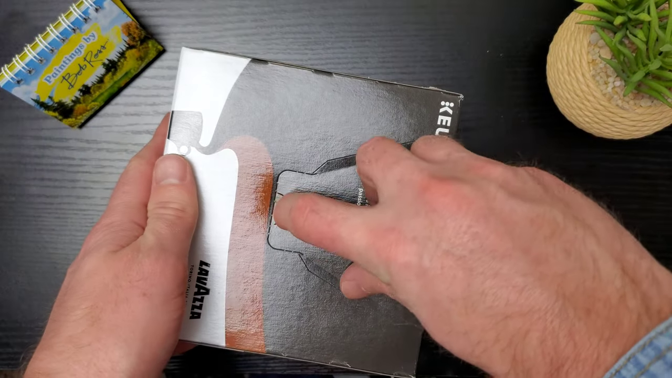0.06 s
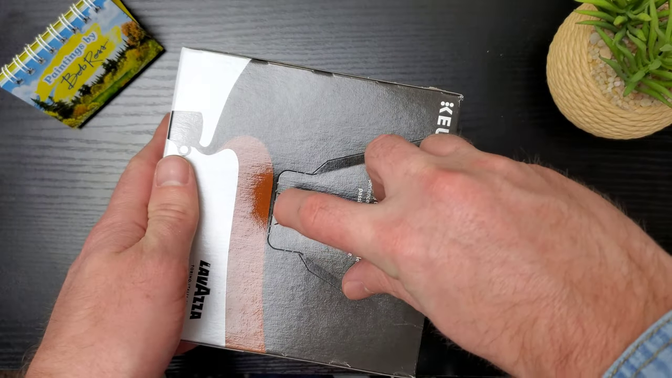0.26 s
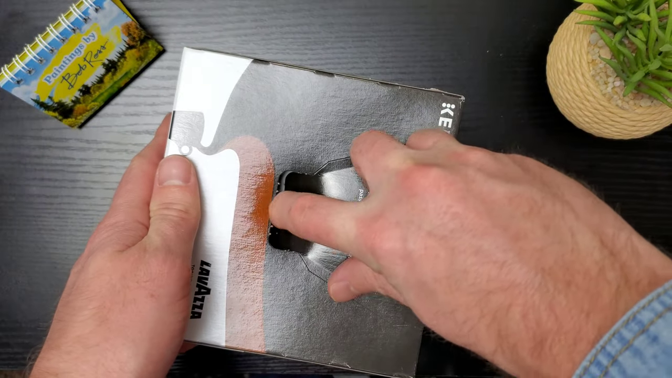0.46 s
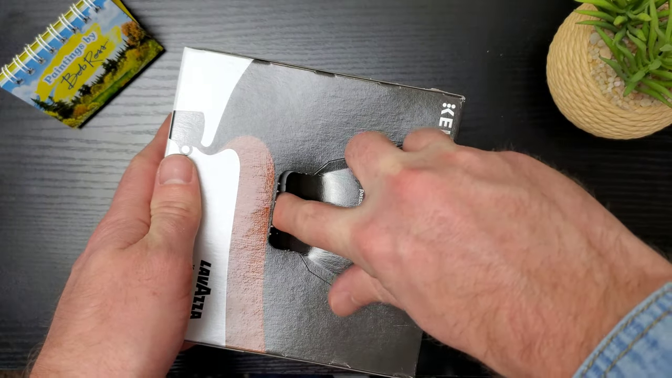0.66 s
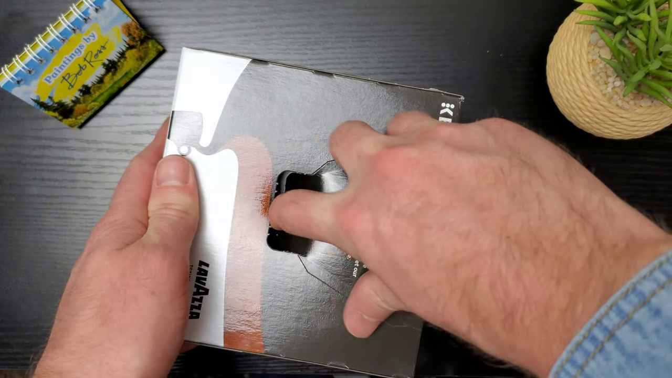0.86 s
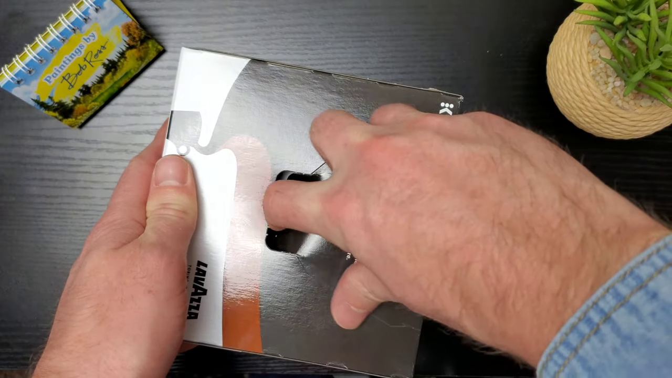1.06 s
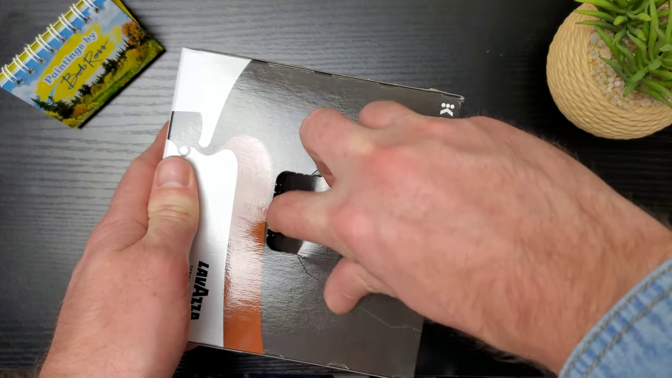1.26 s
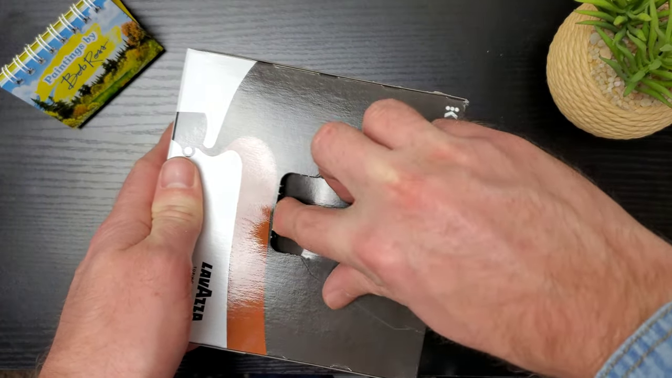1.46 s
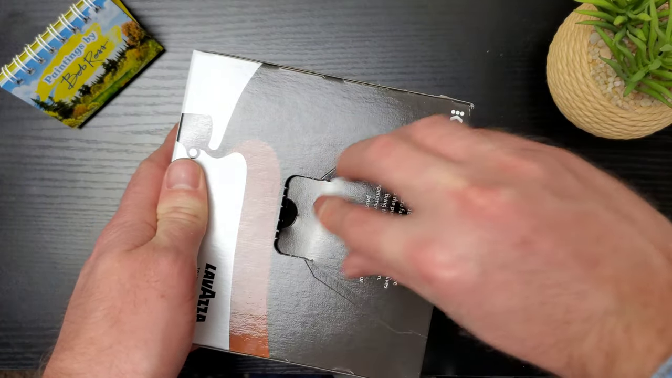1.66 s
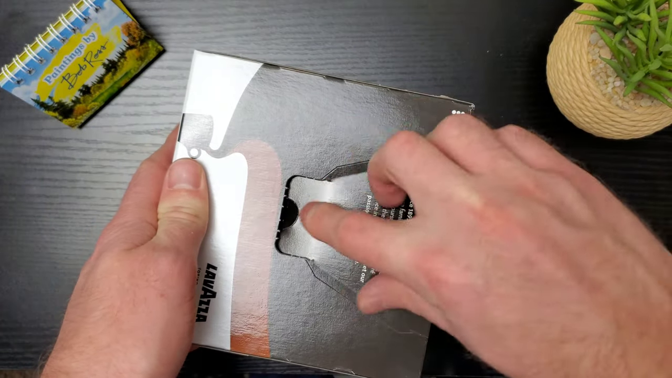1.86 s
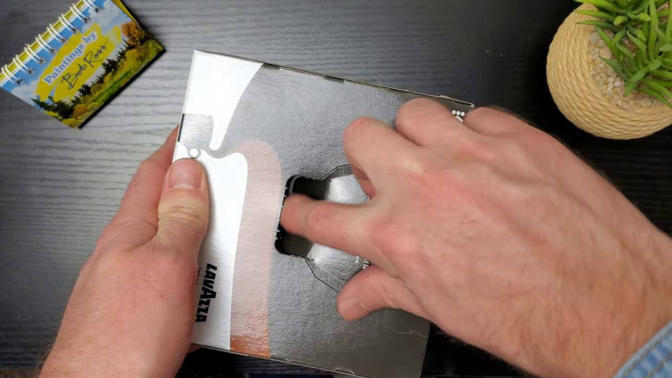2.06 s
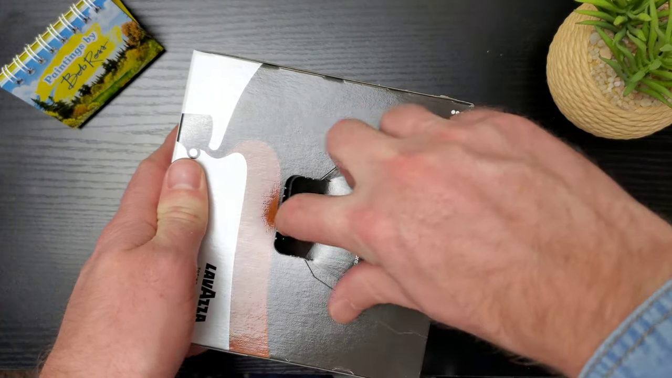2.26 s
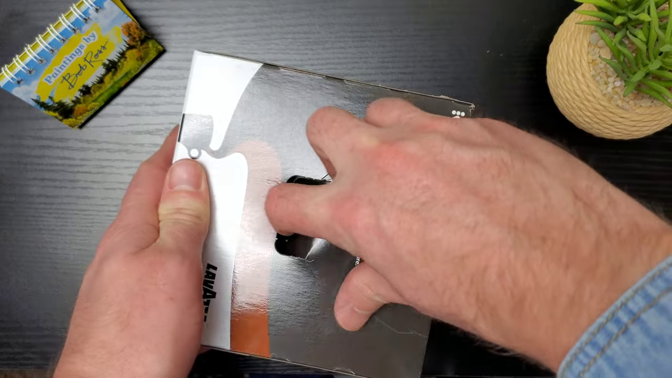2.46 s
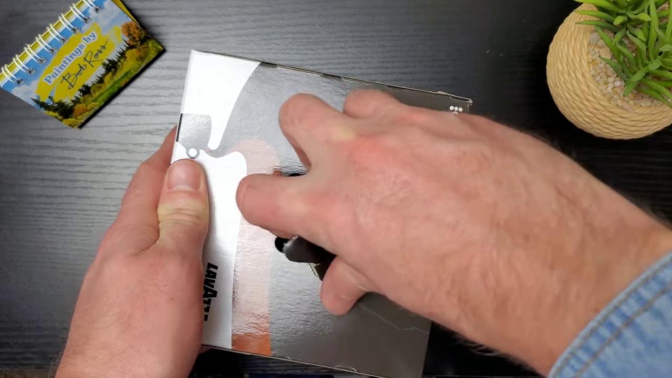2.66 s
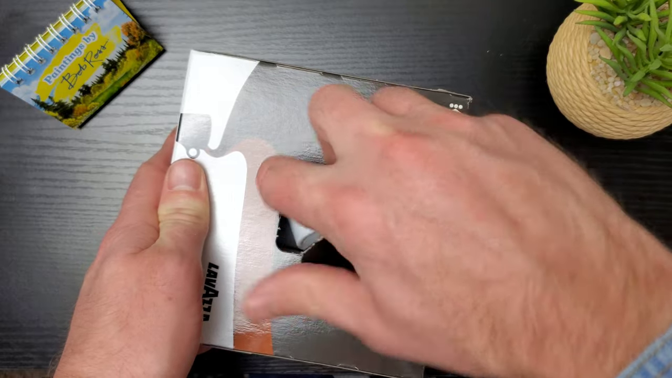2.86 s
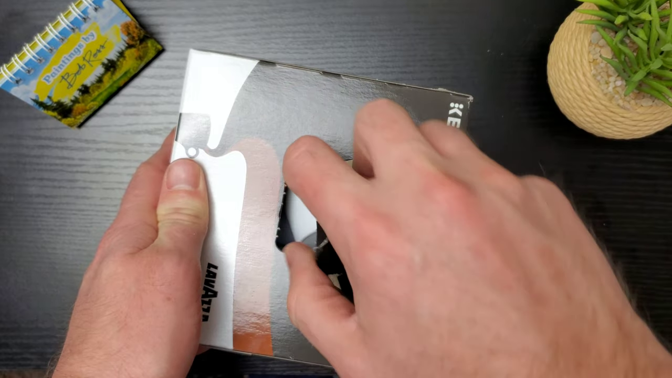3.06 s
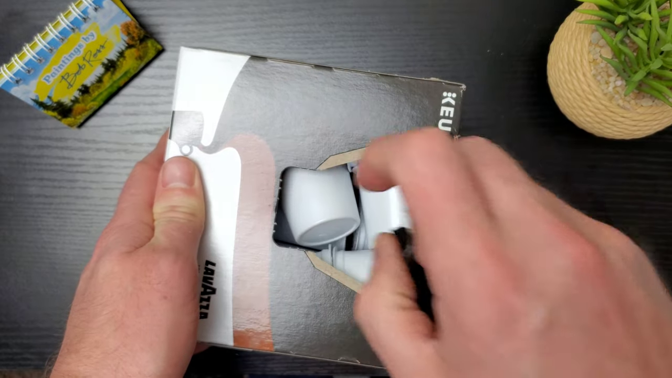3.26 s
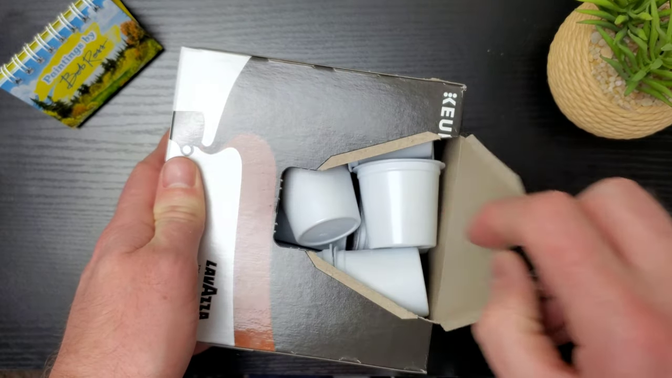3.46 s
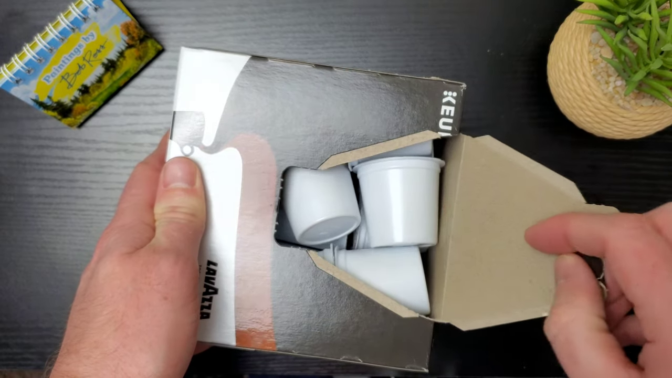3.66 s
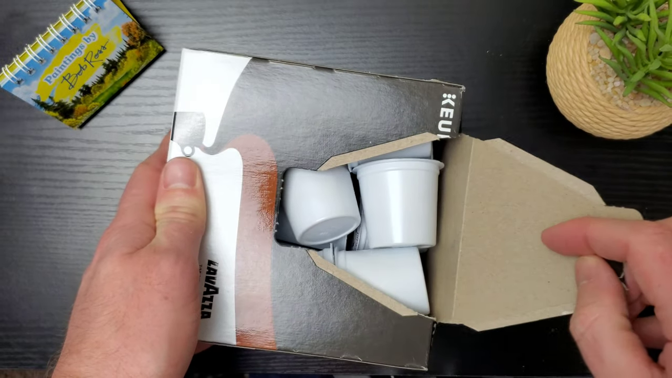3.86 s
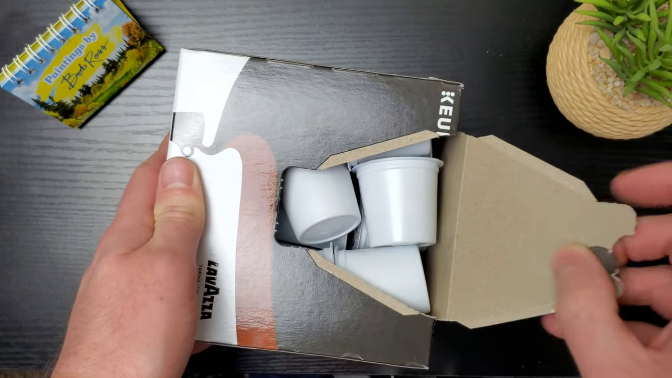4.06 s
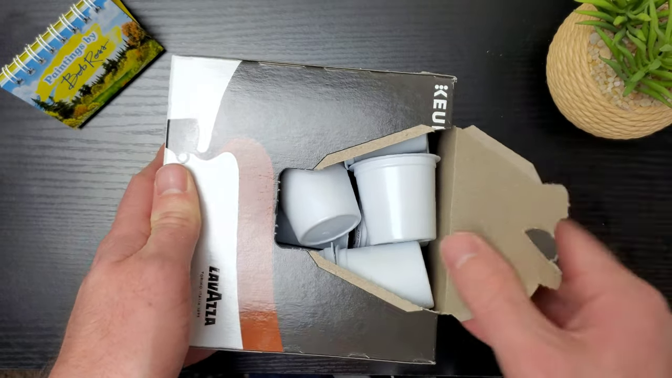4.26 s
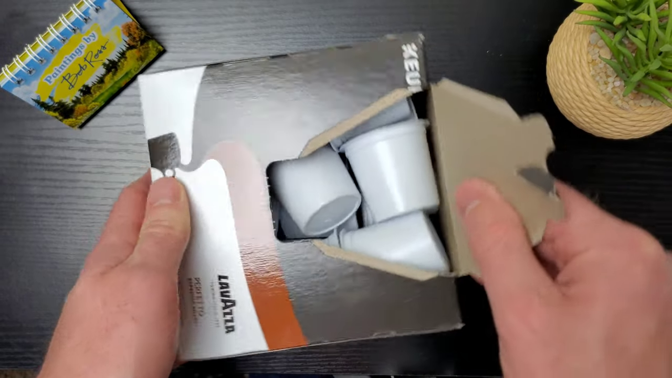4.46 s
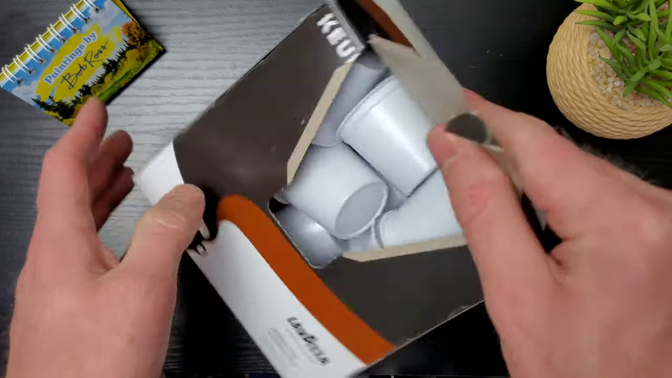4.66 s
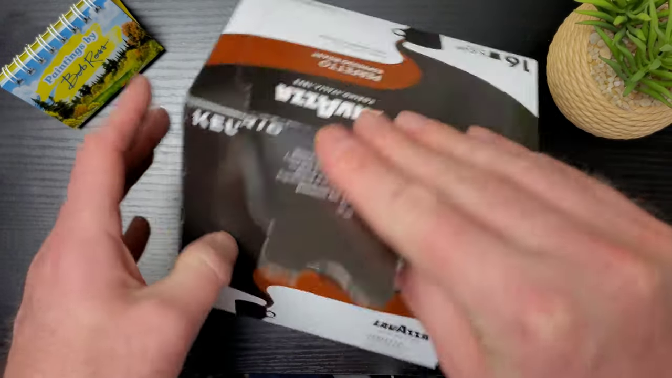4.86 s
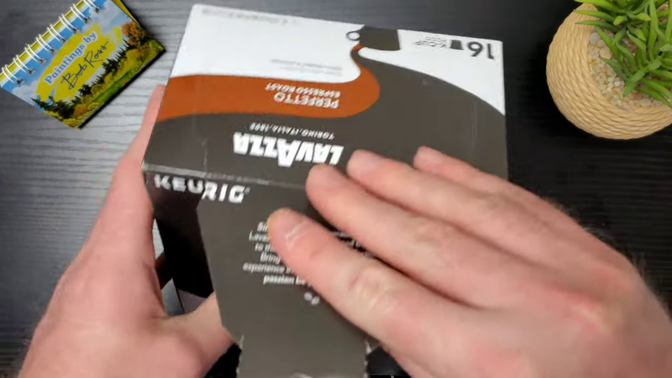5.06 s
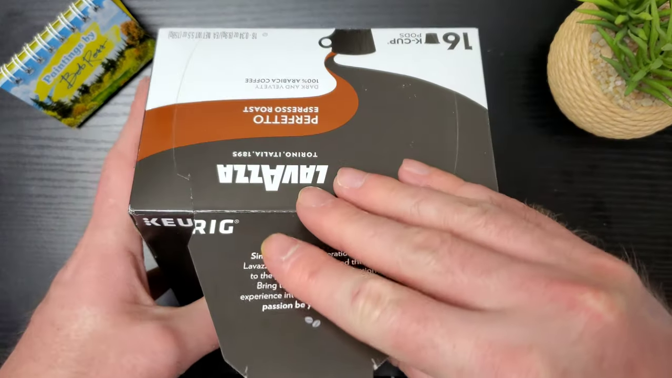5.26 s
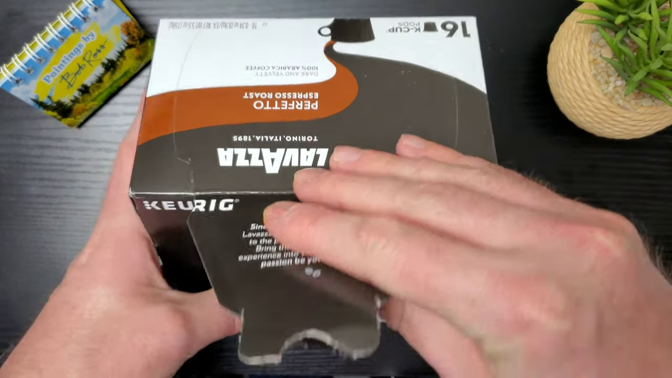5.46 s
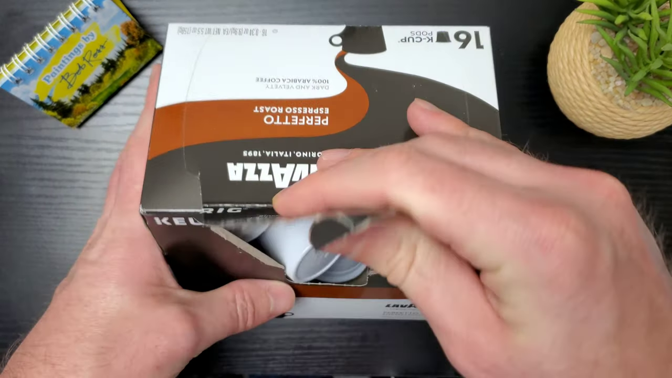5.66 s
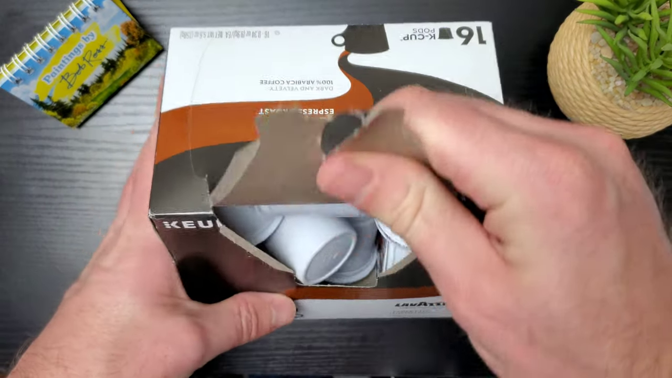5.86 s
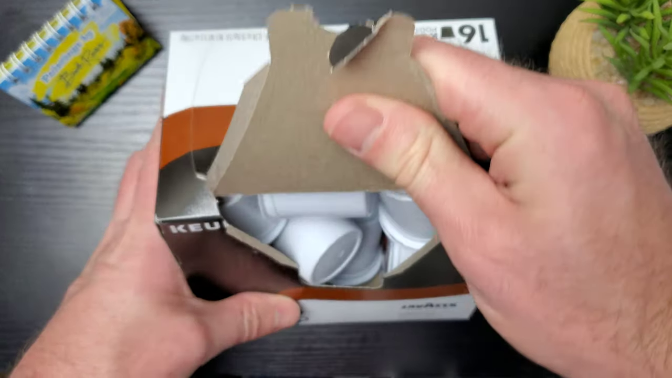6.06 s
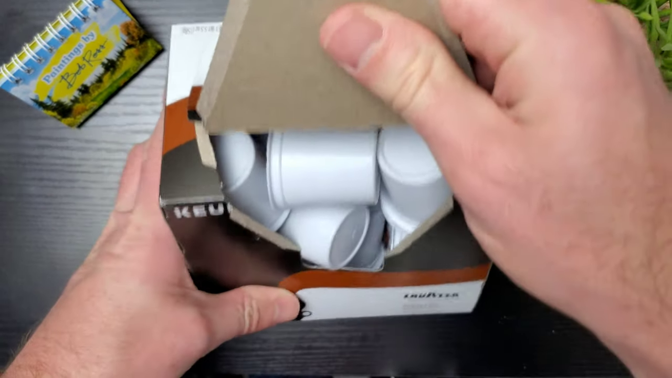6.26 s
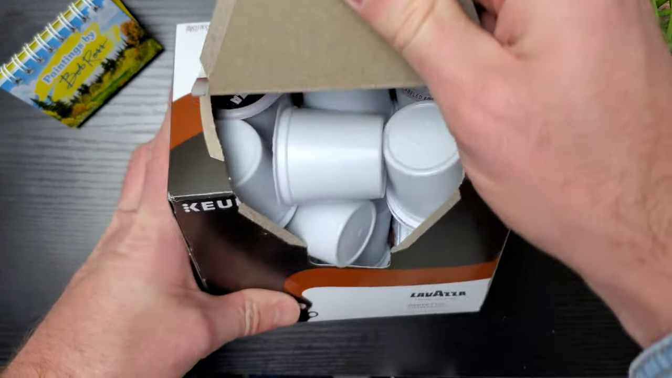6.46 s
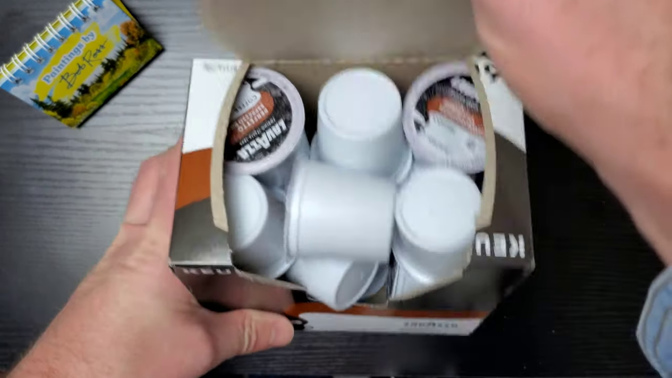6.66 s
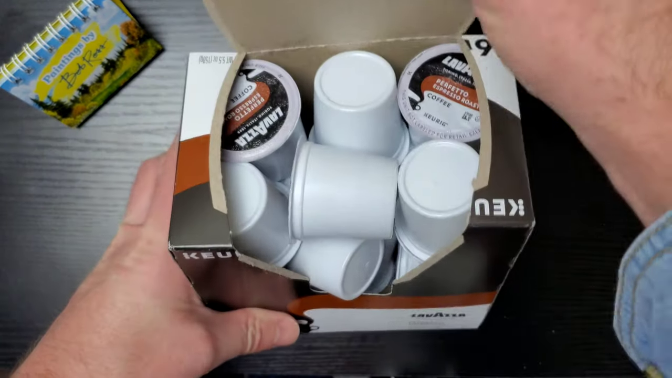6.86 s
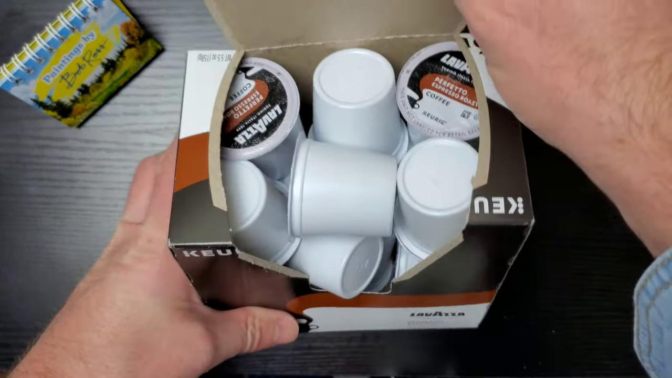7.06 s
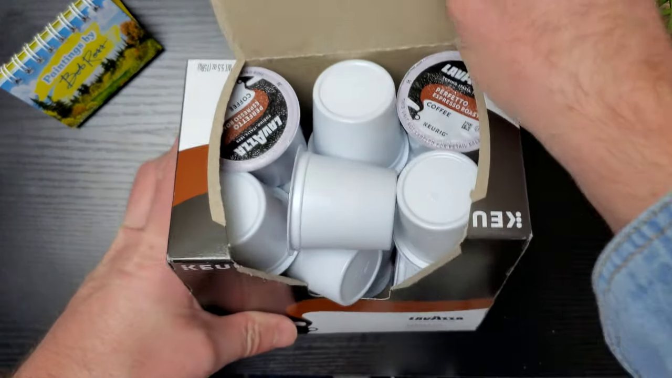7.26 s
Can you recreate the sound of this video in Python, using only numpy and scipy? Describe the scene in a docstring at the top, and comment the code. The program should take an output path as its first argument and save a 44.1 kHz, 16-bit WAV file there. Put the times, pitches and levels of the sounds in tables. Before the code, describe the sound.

Close-up box opening: brittle card snaps, skin rubbing, one loud crease pop, quiet handling, then jerky ripping and a few dull knocks.

```python
"""Opening a perforated cardboard box

Perforation bridges snap, a fingertip judders on the lid, the flap rips and tears, and its crease pops:
bursts of random fibre breaks excite card, box and room resonances. Pods and fingers bump the walls,
hands rub the card (filtered grains) and the desk rumbles (filtered noise).
The microphone is close, in a small room with faint air noise and a low wavering hum."""
import sys
import numpy as np
from scipy import signal
from scipy.fft import rfft, irfft, next_fast_len
from scipy.io import wavfile
from scipy.ndimage import uniform_filter1d, map_coordinates

SR = 44100
rng = np.random.default_rng(int(sys.argv[2]) if len(sys.argv) > 2 else 0)


def transcribe(u):
    """Save the signal u as a 16-bit wav file named by the first command-line argument.

    u: samples, shape (n,) or (channels, n), limited to [-1, 1]; the rate is SR.
    q: integer samples, one column per channel.
    """
    v = np.clip(np.atleast_2d(u).T, -1, 1)
    q = np.round(v * 32767).astype(np.int16)
    wavfile.write(sys.argv[1], SR, q)


N = 321930
RING = 16384  # length of impulse responses and blows [samples]
BLOW = SR // 50  # span over which the energy of a blow is averaged [samples]

# spectral shape of the lid's card: (frequency [Hz], relative density [dB per Hz])
CARD_SPECTRUM = [(29, -45), (50, -4), (163, -4), (297, 0.5), (387, -5.5), (612, 2), (760, -7), (1120, -4),
                 (1990, -14), (2190, -22.5), (2410, -18.5), (2720, -21.5), (8250, -33.5), (14700, -51.5),
                 (15800, -61)]
# spectral shape of the flap: (frequency [Hz], relative density [dB per Hz])
FLAP_SPECTRUM = [(59, -72), (100, -22), (135, -4.5), (271, -2), (314, 1.5), (460, -15), (533, -6.5),
                 (764, -12.5), (849, -16), (1440, -12.5), (3740, -23.5), (8020, -27.5), (11000, -33.5),
                 (14800, -29.5), (15800, -57)]
# spectral shape of rubbed or bumped card: (frequency [Hz], relative density [dB per Hz])
RUB_SPECTRUM = [(76, -22), (130, 7), (190, 0.5), (315, 4.5), (470, -15), (520, -9), (761, -7), (1310, -3.5),
                (2750, -18.5), (4110, -22.5), (4640, -23), (7980, -26), (10800, -34.5), (14300, -32.5),
                (15800, -58)]


def amp(db):
    """Level: converts decibels to an amplitude ratio."""
    return 10 ** (np.asarray(db) / 20)


def unit(x):
    """Normalisation: scales x to an rms of 1."""
    return x / np.sqrt(np.mean(x ** 2) + 1e-20)


def along(points, hz):
    """Interpolation: reads (frequency, value) points on a logarithmic frequency axis."""
    f, v = np.transpose(points)
    return np.interp(np.log(hz + 1), np.log(f + 1), v)


def wobble(rate):
    """Slow fluctuation: a smooth curve through `rate` random knots a second."""
    knots = rng.standard_normal(int(N * rate / SR) + 4)
    return map_coordinates(knots, [np.arange(N) * rate / SR])


def add(track, s, sound):
    """Superposition: mixes a sound into the track at time s [s]."""
    start = max(round(s * SR), 0)
    track[start:start + len(sound)] += sound[:max(N - start, 0)]


def through(x, response):
    """Linear system: convolves x with an impulse response."""
    return signal.fftconvolve(x, response)[:len(x)]


def bands(x, *edges_hz):
    """Filter bank: splits x at the given frequencies, lowest band first."""
    cuts = [(edges_hz[0], "low")]
    cuts += [(pair, "band") for pair in zip(edges_hz, edges_hz[1:])]
    cuts += [(edges_hz[-1], "high")]
    filters = [signal.butter(4, hz, kind, fs=SR, output="sos") for hz, kind in cuts]
    return [signal.sosfilt(sos, x) for sos in filters]


def colour(spectrum):
    """Minimum phase: folding the cepstrum gives a causal response of energy 1 with this spectral shape."""
    magnitude = amp(along(spectrum, np.fft.rfftfreq(RING, 1 / SR)))
    cepstrum = irfft(np.log(magnitude + 1e-6))
    cepstrum[1:RING // 2] *= 2
    cepstrum[RING // 2 + 1:] = 0
    response = irfft(np.exp(rfft(cepstrum)))
    return response / np.linalg.norm(response)


def box(spectrum, ring_db, detune):
    """Modal resonance: the card's broad response plus decaying box modes, which shift with the grip."""
    # walls and enclosed air: (nominal frequency [Hz], bandwidth [Hz], relative peak level [dB])
    modes = [(127, 15, 9), (212, 38, 12.5), (290, 7.9, 11), (443, 13, 1), (475, 20.5, 10), (612, 54, 20),
             (902, 14, 3), (957, 185, 10.5), (1150, 67, -2), (1274, 76, -7.5), (1500, 51, -10.5),
             (1760, 170, -10), (1895, 53, 5), (2373, 150, -1)]
    t = np.arange(RING // 4) / SR
    ring = np.zeros(len(t))
    for k, (hz, width, db) in enumerate(modes):
        shifted_hz = hz * np.exp(detune * rng.normal())
        decay = np.exp(-np.pi * width * t)
        ring += (-1) ** k * amp(db) * width * decay * np.cos(2 * np.pi * shifted_hz * t)
    ring = np.pad(ring / np.linalg.norm(ring), (0, RING - len(t)))
    return colour(spectrum) + amp(ring_db) * ring


def room(wet_db):
    """Reverberation: direct sound, then a fresh diffuse tail with a decay time for each frequency."""
    # reverberation time: (frequency [Hz], time to decay by 60 dB [s])
    decay_times = [(100, 0.21), (260, 0.25), (700, 0.3), (1840, 0.24), (4850, 0.26), (12800, 0.16)]
    hz, t, z = signal.stft(rng.standard_normal(RING), SR, nperseg=256)
    decay = amp(-60 * t / along(decay_times, hz)[:, None])
    tail = signal.istft(z * decay, SR, nperseg=256)[1][:RING]
    tail *= 1 - np.exp(-(np.arange(RING) / SR / .003) ** 2)  # builds up within a few milliseconds
    response = amp(wet_db) * tail / np.linalg.norm(tail)
    response[0] += 1
    return response


def fibres(size, rate, spread_db):
    """Fracture noise: tiny breaks at random moments (rate per second), a few much larger than the rest."""
    sizes = amp(spread_db * np.clip(rng.standard_normal(size), -2, 2))
    signs = rng.choice([-1, 1], size)
    return sizes * signs * (rng.random(size) < rate / SR)


def gesture(start, length, attack, release):
    """Force envelope: a push builds up exponentially before start, holds at 1 and lets go."""
    t = np.arange(N) / SR - start
    return np.exp(np.minimum(t, 0) / attack - np.maximum(t - length, 0) / release)


def resonate(x, hz, q, boost_db):
    """Resonance: adds the response of one lightly damped mode to x."""
    return x + amp(boost_db) * signal.lfilter(*signal.iirpeak(hz, q, SR), x)


def band_levels(x):
    """Band energy: thump, panel, crack and fizz levels [dB], the energy averaged over BLOW samples."""
    # limits of the four bands: (thump from, panel from, crack from, fizz from, fizz to) [Hz]
    edges_hz = (90, 400, 2500, 9300, 15500)
    power = 2 * np.abs(rfft(x)) ** 2 / len(x) / BLOW
    in_band = np.histogram(np.fft.rfftfreq(len(x), 1 / SR), edges_hz, weights=power)[0]
    return 10 * np.log10(in_band + 1e-20)


def voiced(x, levels_db):
    """Equalisation: tilts x smoothly towards four band levels, then sets the panel level exactly."""
    # centres of the bands: (thump, panel, crack, fizz) [Hz]
    centres_hz = (230, 900, 4800, 12000)
    x = through(x, colour(list(zip(centres_hz, levels_db - band_levels(x)))))
    return x * amp(levels_db[1] - band_levels(x)[1])


def blow(spectrum, levels_db, hz, length, rate, rise, first_db, ring_db, flex_q, flex_db, wet_db):
    """Impulsive excitation: one release amid a dying burst of breaks makes card, box and room ring."""
    t = np.arange(RING) / SR
    envelope = np.exp(-(t / length) ** 2) * (1 - np.exp(-(t / rise) ** 2))
    burst = fibres(RING, rate, spread_db=4) * envelope
    burst[int(rise * SR)] += amp(first_db) * np.linalg.norm(burst[:BLOW // 2]) + 1e-6  # the release
    walls = through(burst, box(spectrum, ring_db, detune=0.042))
    card = resonate(walls, hz, flex_q, flex_db)
    return voiced(through(card, room(wet_db)), levels_db)


def snapping():
    """Brittle fracture: perforation bridges release their strain, singly or in quick runs, and the lid rings."""
    # bridges giving way: (time [s], panel level [dB], thump re panel [dB], crack re panel [dB],
    # fizz re panel [dB], flexing pitch [Hz], burst length [s])
    snaps = [(0.354, -41, -12, -10, -13, 550, .008), (0.373, -30.5, -12, -12, -14, 550, 0.016),
             (.4, -10.5, -19.5, -20.5, -37, 1400, 0.0077), (.411, -8, -11.5, -15.5, -37, 620, 0.037),
             (0.646, -21, 5, -7, -19, 1150, 0.0076), (0.861, -37, -2, -6, -15, 1010, 0.01),
             (.918, -26.5, -10, -16.5, -18, 1180, .008), (1.299, -33.5, 3, -12.5, -30, 1300, 0.0039),
             (1.621, -19, -.5, -10.5, -26.5, 1310, 0.0082), (1.893, -25.5, -11, -16, -32, 566, 0.0085),
             (2.643, -26.5, 0, -25, -35, 580, .008), (2.661, -9, -7, -13, -38, 438, 0.0087),
             (2.681, -13, 6, -15, -36, 467, 0.0046), (2.707, -8.5, -3.5, -12.5, -30, 990, 0.0083),
             (2.721, -12, -2.5, -16.5, -33, 1110, .02), (2.867, -26.5, -7, 0, -18, 640, 0.01),
             (2.881, -21, -7, -10, -17.5, 1410, 0.011), (2.915, -21, -7.5, -3.5, -23, 1480, 0.011),
             (3.131, -33, -6, -20, -35, 550, 0.011), (3.168, -20, -5, -4, -10.5, 1410, 0.011),
             (3.175, -11.5, -6.5, -13, -30, 810, 0.013), (3.193, -15.5, -15, -20.5, -30, 1460, 0.0093),
             (3.463, -40, -10, -7, -17, 1400, 0.01), (3.538, -39, 3, -2, -11, 1200, 0.0046)]
    out = np.zeros(N)
    for s, db, thump_db, crack_db, fizz_db, hz, length in snaps:
        levels_db = db + np.array([thump_db, 0, crack_db, fizz_db])
        add(out, s, blow(CARD_SPECTRUM, levels_db, hz, length, rate=4500, rise=.0027, first_db=-10.5,
                         ring_db=-9.5, flex_q=4.1, flex_db=-4.5, wet_db=-3.0))
    return out


def ripping(length=0.0059, fizz_db=-9.5):
    """Stick-slip fracture: each jerk on the flap breaks a short stretch of its edge; fizz is re crack."""
    # jerks along the side: (time [s], panel level [dB], thump re panel [dB], crack re panel [dB],
    # flexing pitch [Hz])
    rips = [(6.022, -41, -16, 6, 2200), (6.083, -26.5, -7, -2, 2200), (6.102, -22, -22, -3, 2220),
            (6.123, -26.5, -27, -2, 2310), (6.144, -23.5, -18, -2, 2000), (6.165, -13.5, 1.5, -8.5, 1450),
            (6.185, -11, -11, -15.5, 940), (6.241, -25, -10, -2.5, 1280), (6.417, -32.5, -4, -2, 1420),
            (6.433, -34.5, -5, -4, 1470), (6.463, -26, -9, -7, 1560), (6.579, -10.5, -13, -14.5, 1370),
            (6.599, -19.5, -4, -10, 1240), (6.615, -14.5, -6.5, -11, 1700), (6.643, -21.5, -6, -7.5, 1980),
            (6.676, -18, -6, -8, 1170), (6.703, -22.5, -2.5, -13, 1210), (6.717, -21.5, -13, -17.5, 1220),
            (7.023, -39.5, -29, 4.5, 1800)]
    out = np.zeros(N)
    for s, db, thump_db, crack_db, hz in rips:
        levels_db = db + np.array([thump_db, 0, crack_db, crack_db + fizz_db])
        add(out, s, blow(FLAP_SPECTRUM, levels_db, hz, length, rate=2500, rise=.0035, first_db=-13.5,
                         ring_db=-6.0, flex_q=5.3, flex_db=6, wet_db=-3))
    return out


def popping(length=0.0066):
    """Sudden buckling: the crease of the folded flap gives way, with a dry broad crack and a push of air."""
    # the pop: (time [s], panel level [dB], thump re panel [dB], crack re panel [dB], fizz re panel [dB])
    pop = (3.772, -8.5, -6, -4, -27.5)
    # spectral shape of the crease: (frequency [Hz], relative density [dB per Hz])
    crease = [(30, -32), (55, -1), (110, 0.5), (230, -8), (450, -6), (950, -4.5), (2400, -11.5),
              (3300, -22), (4800, -21.5), (8300, -27), (10500, -40.5), (15500, -37)]
    out = np.zeros(N)
    s, db, thump_db, crack_db, fizz_db = pop
    levels_db = db + np.array([thump_db, 0, crack_db, fizz_db])
    add(out, s, blow(crease, levels_db, hz=980, length=length, rate=8000, rise=.002, first_db=-10,
                     ring_db=-16, flex_q=11, flex_db=-9, wet_db=-3))
    return out


def tearing(thump_db=-3, attack=0.019, release=0.027):
    """Progressive fracture: a running tear breaks fibres in clumps, which shake the flap."""
    # running tears: (start [s], length [s], fibre level [dB], panel level [dB])
    tears = [(2.73, 0.13, -46.5, -48), (2.872, 0.086, -38.5, -37), (6.186, 0.037, -26, -17),
             (6.578, 0.15, -34, -33.5)]
    breaks = fibres(N, rate=700, spread_db=6) * amp(3 * wobble(110))
    flap = through(breaks, box(FLAP_SPECTRUM, ring_db=-6, detune=.02))
    sound = through(flap, room(-6))
    thump, panel, crackle = map(unit, bands(sound, 345, 2630))
    body = panel + amp(thump_db) * thump
    out = np.zeros(N)
    for s, length, fibre_db, panel_db in tears:
        pull = gesture(s, length, attack, release)
        out += pull * (amp(fibre_db) * crackle + amp(panel_db) * body)
    return out


def judder(length=0.01704, level_db=1, scrape_db=-17, wet_db=-13):
    """Stick-slip friction: each slip scrapes briefly and swings the lid, rising then falling in pitch."""
    # fingertip slips: (time [s], level before the common gain level_db [dB], highest pitch [Hz])
    slips = [(.403, -8, 576), (.525, -17.5, 566), (.553, -14, 583), (.574, -13.5, 588), (.592, -12, 597),
             (.612, -20, 580), (1.897, -19.5, 563), (2.884, -14, 628), (2.915, -13.5, 606),
             (3.193, -11.5, 638)]
    out = np.zeros(N)
    u = np.linspace(0, 1, int(length * SR))
    arch = 1 - .4 * (2 * u - 1) ** 2
    for s, db, hz in slips:
        phase = 2 * np.pi * np.cumsum(hz * arch) / SR
        swing = np.abs(np.sin(np.pi * u)) ** .5 * np.sin(phase)
        fading_noise = rng.standard_normal(len(u)) * (1 - u) ** 2
        scrape = unit(through(fading_noise, colour(CARD_SPECTRUM)))
        slip = np.pad(swing + amp(scrape_db) * scrape, (0, RING))
        add(out, s, amp(db + level_db) * through(slip, room(wet_db)))
    return out


def bumping(centre_hz=1080, scatter=0.22, length=0.012, fizz_db=-8.5):
    """Soft impact: pods and fingers knock the walls, each spot with its own pitch; fizz is re crack."""
    # knocks: (time [s], panel level [dB], thump re panel [dB], crack re panel [dB])
    bumps = [(.928, -29.5, -15, -40), (2.22, -35.5, -5, -19), (2.354, -34.5, -2, -28),
             (4.211, -34.5, 10.5, 4.5), (4.654, -40, 8, -26), (4.893, -38.5, -3, -20), (4.982, -34, 9, -6),
             (5.043, -39.5, 4, -25), (5.558, -42, 19.5, -8), (6.33, -40.5, 9, -10), (6.824, -28, -1, -19),
             (6.842, -27.5, 9.5, -22), (7.096, -37, 5, -7), (7.25, -40.5, -2, -17)]
    out = np.zeros(N)
    for s, db, thump_db, crack_db in bumps:
        hz = centre_hz * np.exp(scatter * (2 * rng.random() - 1))
        levels_db = db + np.array([thump_db, 0, crack_db, crack_db + fizz_db])
        add(out, s, blow(RUB_SPECTRUM, levels_db, hz, length, rate=1600, rise=0.00386, first_db=-11.5,
                         ring_db=-1.5, flex_q=9.8, flex_db=13, wet_db=-4.5))
    return out


def patchy(x, depth_db):
    """Time-varying filtering: the colour of x drifts as the contact patch moves."""
    z = signal.stft(x, nperseg=512)[2]
    field = uniform_filter1d(rng.standard_normal(z.shape), size=9, axis=0)  # smooth over frequency
    field = uniform_filter1d(field, size=12, axis=1)  # smooth over time
    return signal.istft(z * amp(depth_db * unit(field)), nperseg=512)[1][:N]


def handling(attack=0.026, release=0.041):
    """Sliding friction: skin and desk drag over the card in fine catches, and the box booms softly."""
    # hand strokes: (start [s], length [s], rub level [dB], hollow re rub [dB], hiss re rub [dB])
    strokes = [(0, .1, -52.5, 7.5, -21), (0.276, 0.036, -50.5, 5.5, -7.5), (0.73, 0.48, -52, 4, -8),
               (1.59, 0.045, -44, -5, -18), (2.038, 0.13, -35, -3.5, -15.5), (2.336, 0.45, -48.5, 6, -12.5),
               (3.027, 0.29, -46.5, 5.5, -13.5), (3.497, 0.1, -43.5, -1.5, -10.5),
               (4.061, 0.18, -42, -2, -7.5), (4.19, 0.58, -46, -0.5, -4.5), (4.659, 0.13, -41.5, 6, -5),
               (4.763, 0.066, -39, -2, -4.5), (4.964, 0.14, -41, 4.5, -10.5), (5.1, .12, -45.5, 1, -11),
               (5.23, 0.054, -43.5, 1, -8), (5.426, 0.12, -51.5, 1, -6.5), (5.553, 0.28, -45, 7, -13),
               (5.81, 0.32, -39.5, 2, -12), (6.325, 0.21, -46.5, 1.5, -9), (6.828, 0.065, -40.5, -7, -5.5),
               (6.929, 0.045, -40.5, -9, 1.5), (7.023, 0.36, -50.5, -5, -6.5)]
    # hands that only hold the box: (hollow level [dB], rub level [dB], hiss level [dB])
    resting_db = (-49, -60, -77)
    grains = fibres(N, rate=2500, spread_db=5) * amp(2.2 * wobble(35))
    catches = patchy(grains, depth_db=2.3)
    card = through(catches, box(RUB_SPECTRUM, ring_db=-10, detune=0.014))
    sound = through(card, room(wet_db=-4.0))
    gains = amp(resting_db)[:, None]
    for s, length, db, hollow_db, hiss_db in strokes:
        stroke = gesture(s, length, attack, release)
        stroke_gains = np.outer(amp([db + hollow_db, db, db + hiss_db]), stroke)
        gains = np.maximum(gains, stroke_gains)
    return sum(gain * unit(band) for gain, band in zip(gains, bands(sound, 470, 3980)))


def holding(breaks, hold_db=-43, recoil_db=-22.5, recoil_s=0.031, attack=.025, release=0.06):
    """Force-driven noise: the desk rumbles under the hand, more with shoves and recoil from breaking card."""
    # shoves of the box against the desk: (start [s], length [s], rumble level [dB])
    shoves = [(2.414, 0.055, -29), (4.994, 0.2, -35.5), (5.598, .4, -36.5), (6.587, .44, -32)]
    # spectral shape of the desk: (frequency [Hz], relative density [dB per Hz])
    rumble = [(8.8, -44), (15, 0.5), (32, 4.5), (70, -4.5), (87, -1.5), (102, -5.5), (160, -15), (210, -43),
              (350, -120)]
    keep = np.exp(-1 / (recoil_s * SR))  # smoothing with time constant recoil_s
    smoothed = signal.lfilter([1 - keep], [1, -keep], np.abs(breaks))
    recoil = amp(recoil_db) * np.sqrt(smoothed)
    shove = sum(amp(db) * gesture(s, length, attack, release) for s, length, db in shoves)
    force = np.sqrt(amp(hold_db) ** 2 + recoil ** 2 + shove ** 2)
    return force * unit(through(rng.standard_normal(N), colour(rumble)))


def room_tone(hum_hz=79, hum_db=-43, air_db=-48.5):
    """Stationary background: shaped air noise and a low hum wavering in phase and level."""
    # spectral shape of the air noise: (frequency [Hz], relative density [dB per Hz])
    air = [(12, -40), (20, -43), (88, -2), (197, -6.5), (308, -24), (431, -11), (554, -9.5), (866, -21.5),
           (1250, -18), (2800, -31.5), (4370, -31.5), (14100, -40), (15800, -45)]
    phase = 2 * np.pi * hum_hz * np.arange(N) / SR + .5 * wobble(3.7)
    hum = np.sin(phase) * amp(1.7 * wobble(8.6))
    noise = through(rng.standard_normal(N), colour(air))
    return amp(hum_db) * unit(hum) + amp(air_db) * unit(noise)


def scene():
    """Superposition: all sources add at one close microphone."""
    breaks = snapping() + popping() + ripping() + tearing()
    contact = bumping() + judder() + handling() + holding(breaks)
    return (breaks + contact + room_tone())[None]


def record(dry, ceiling=0.76, hardness=5, top_hz=15700):
    """Saturation and band limiting: the loudest peaks are rounded off, nothing stays above top_hz."""
    rounded = dry / (1 + np.abs(dry / ceiling) ** hardness) ** (1 / hardness)
    m = next_fast_len(N + RING)
    passed = np.fft.rfftfreq(m, 1 / SR) < top_hz
    return irfft(rfft(rounded, m) * passed, m)[..., :N]


dry = scene()
out = record(dry)
transcribe(out)
```